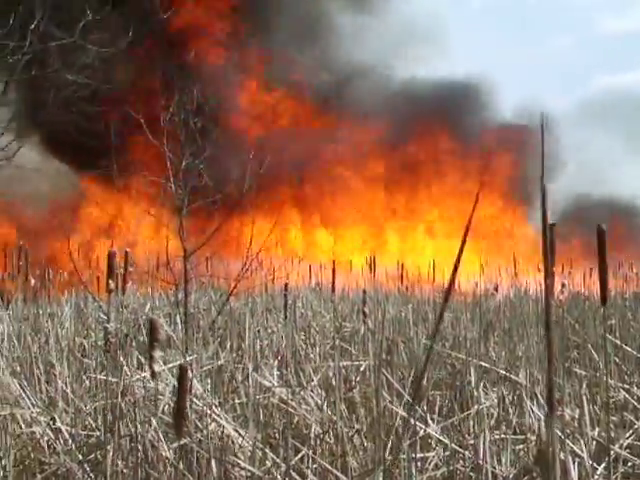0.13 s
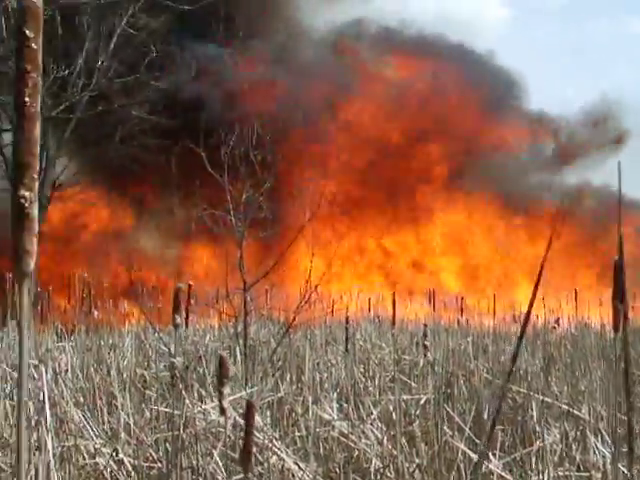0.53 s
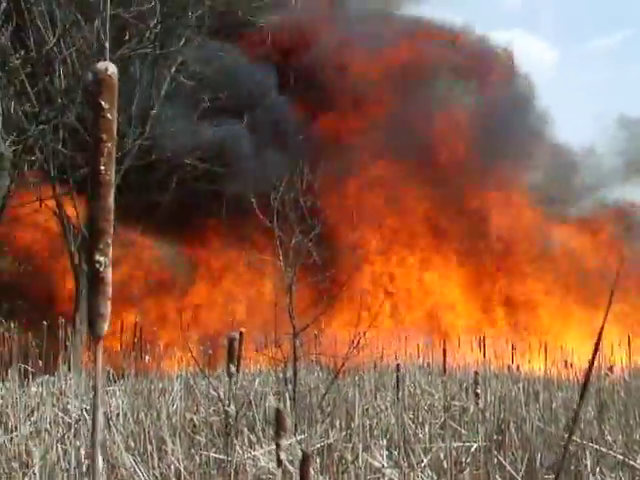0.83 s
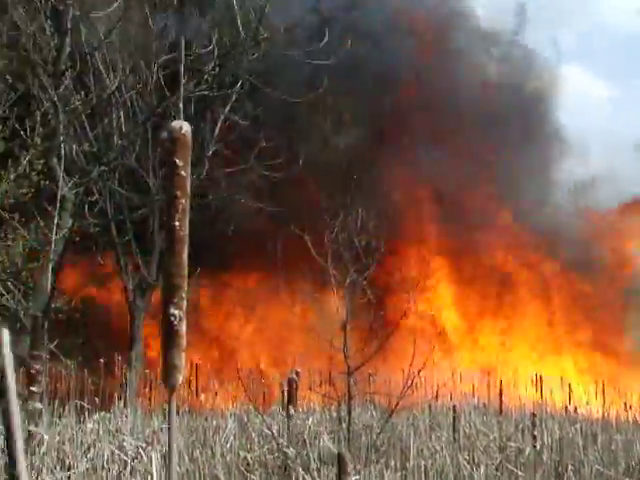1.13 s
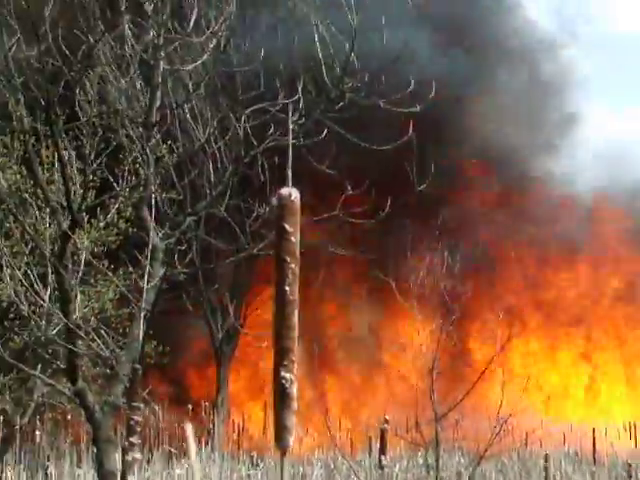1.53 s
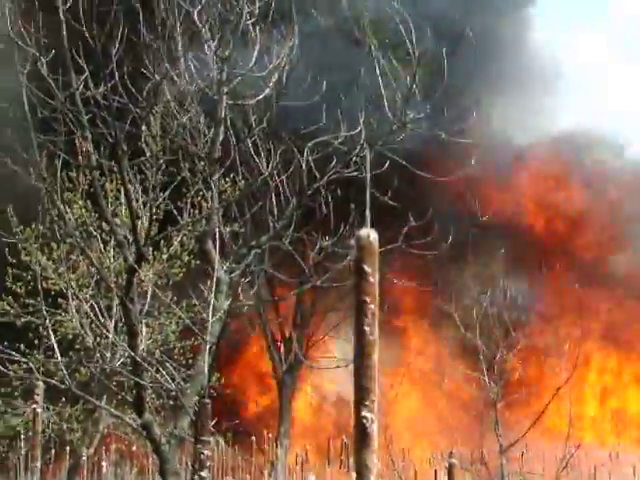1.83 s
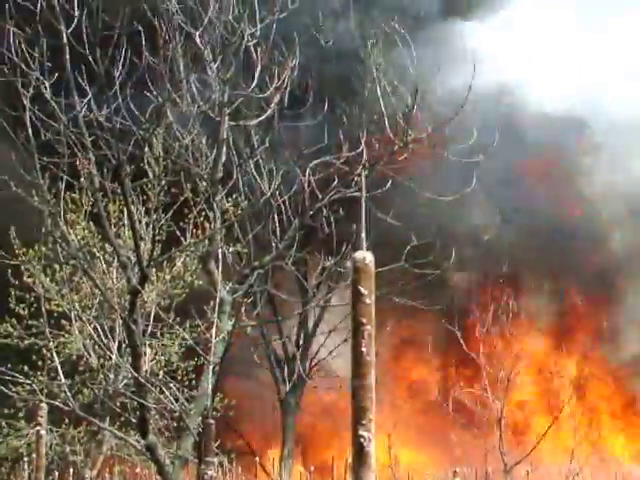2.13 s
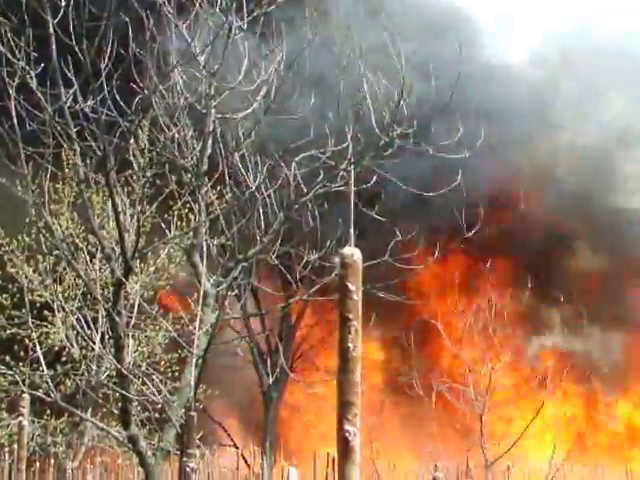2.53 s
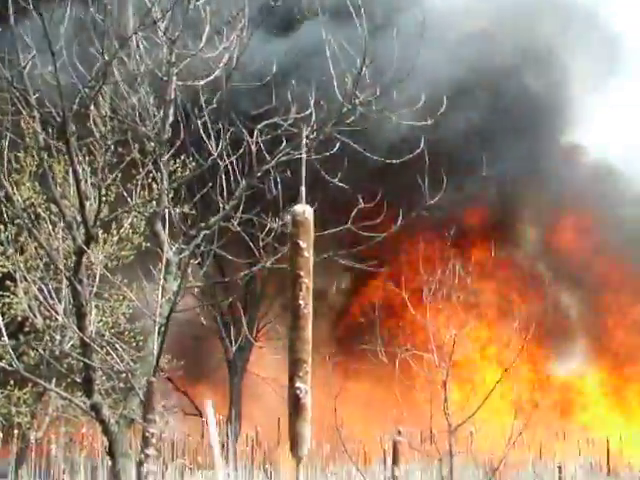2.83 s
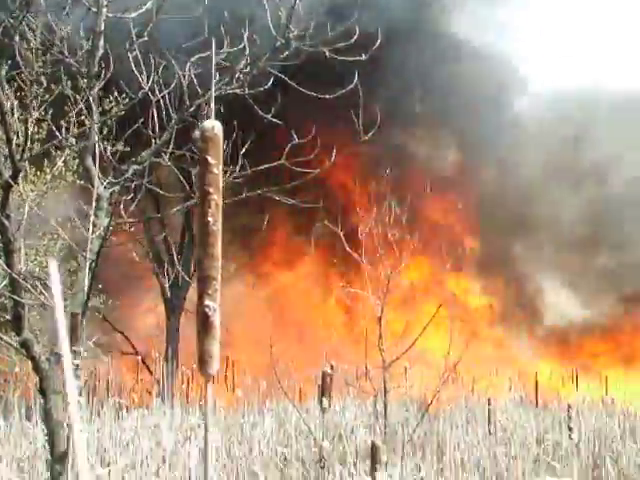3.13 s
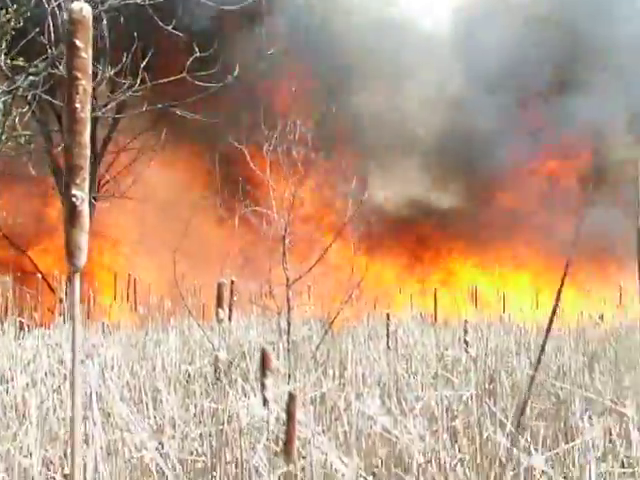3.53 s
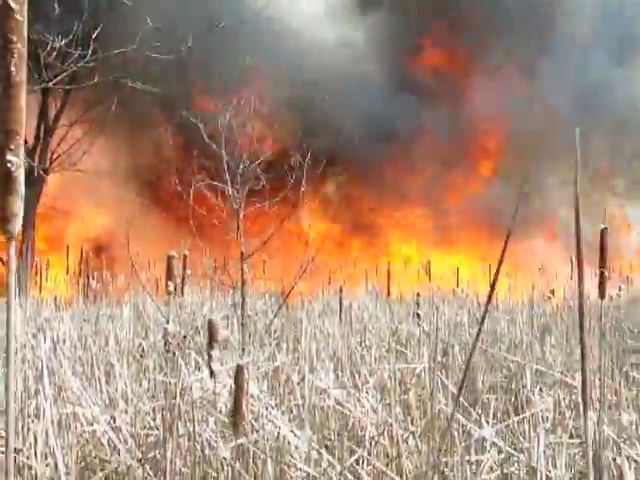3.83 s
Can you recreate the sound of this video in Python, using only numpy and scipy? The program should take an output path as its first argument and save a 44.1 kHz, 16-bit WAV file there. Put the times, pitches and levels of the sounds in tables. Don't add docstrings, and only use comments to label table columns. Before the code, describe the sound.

Fire in dry reeds: low turbulent roar and fine crackling throughout, a faint wavering draught whistle, one tiny bird chirp near one second, then sharper close pops in bursts. Open air, mono, limited treble, no echo.

```python
import sys
import numpy as np
from scipy import signal
from scipy.fft import rfft, irfft
from scipy.io import wavfile

SR = 44100
rng = np.random.default_rng(int(sys.argv[2]) if len(sys.argv) > 2 else 0)


def elevation(decibels):
    levels = np.asarray(decibels, float)
    return 10 ** (levels / 20)


def waveform_to_disk(signal):
    frames = np.transpose(np.atleast_2d(signal))
    scaled = np.clip(frames, -1, 1) * 32767
    samples = np.round(scaled).astype(np.int16)
    wavfile.write(sys.argv[1], SR, samples)


N = 176400

# t/s, wash level/dB
FAR_BURN = [
    (0.0, -33.5),
    (1.07, -34),
    (1.63, -32.5),
    (2.49, -33),
    (2.93, -33.5),
    (3.59, -32.5),
    (4.0, -35),
]
# f/Hz, density/dB per Hz
STEM_COLOUR = [(900, -28.5), (1500, -5), (2000, 0.5), (2600, -2), (4200, -2), (6000, -5), (8000, -8),
               (10000, -6)]
# t/s, sizzle level/dB
NEAR_BURN = [(0, -50), (.3, -47), (1.2, -50.5), (1.5, -40), (1.9, -38), (2.25, -37), (2.6, -38), (3.0, -42),
             (3.25, -41), (3.45, -35), (3.75, -36.5), (4, -43)]


def rms_one(x):
    return x / np.sqrt(np.mean(x ** 2) + 1e-20)


def in_time(rows):
    t_s, value = np.transpose(rows)
    return np.interp(np.arange(N) / SR, t_s, value)


def at_hz(points, hz):
    f_hz, db = np.transpose(points)
    return np.interp(np.log(hz), np.log(f_hz), db)


def drift(rate_hz):
    hop = 40
    r = np.exp(-2 * np.pi * rate_hz * hop / SR)
    noise = rng.standard_normal(N // hop + 2002)
    slow = signal.lfilter([1], [1, -2 * r, r * r], noise)[2000:]
    return np.interp(np.arange(N) / hop, np.arange(len(slow)), rms_one(slow - slow.mean()))


def resonance(x, hz, width_hz):
    r = np.exp(-np.pi * width_hz / SR)
    zeros = (1 - r * r) / 2 * np.array([1, 0, -1])
    poles = [1, -2 * r * np.cos(2 * np.pi * hz / SR), r * r]
    return signal.lfilter(zeros, poles, x)


def coloured(spectrum):
    hz = np.maximum(np.fft.rfftfreq(N, 1 / SR), 1)
    return rms_one(irfft(rfft(rng.standard_normal(N)) * elevation(at_hz(spectrum, hz)), N))


def decaying(hits, decay_s):
    return signal.lfilter([1], [1, -np.exp(-1 / (decay_s * SR))], hits + 1e-18)


def roar():
    # t/s, roar level/dB
    draught = [
        (0.0, -29),
        (0.61, -29.5),
        (2.75, -29.5),
        (2.94, -29.5),
        (4.0, -31.5),
    ]
    # f/Hz, density/dB per Hz
    body_colour = [(12, -39.5), (20, -3.5), (49, 1), (196, 1), (290, -1.5), (375, -9), (420, -16.5),
                   (550, -37.5), (920, -120)]
    # f/Hz, density/dB per Hz
    tongue_colour = [(250, -20.5), (400, -6), (520, -2.5), (800, 0.5), (1000, -1.5), (1300, -3),
                     (1700, -7.5), (2600, -20.5)]
    db = in_time(draught)
    mean_db = db.mean()
    rumble_db = mean_db + 0.33 * (db - mean_db) - 3
    rumble = elevation(rumble_db) * coloured(body_colour)
    rush_db = db - 1.5 + 0.24 * drift(2.2)
    return rumble + elevation(rush_db) * coloured(tongue_colour)


def wash():
    level_db = in_time(FAR_BURN) + 2.5 + 0.5 * drift(3.6) + 1.1 * drift(44.0)
    return elevation(level_db) * coloured(STEM_COLOUR)


def crackle():
    rate_per_s, level_db, spread_db, decay_s, relative_width = 350, -40.5, 1, 0.0011, 0.58
    burn_db = in_time(FAR_BURN)
    burn_db = burn_db - burn_db.mean()
    sizes = elevation(spread_db * np.minimum(rng.exponential(1, N), 4.0))
    clumps = elevation(1.5 * burn_db + 4.0 * drift(9.0))
    born = rng.random(N) < rate_per_s * clumps / SR
    band_of_stem = rng.integers(0, 12, N)
    noise = rng.standard_normal(N)
    out = np.zeros(N)
    for k, hz in enumerate(np.geomspace(1600, 8000, num=12)):
        spits = noise * decaying(sizes * born * (band_of_stem == k), decay_s)
        band = rms_one(resonance(spits, hz, relative_width * hz))
        out += elevation(at_hz(STEM_COLOUR, hz)) * np.sqrt(hz) * band
    return elevation(level_db + burn_db) * rms_one(out)


def sizzle():
    centre_hz, width_hz = 6920, 2550
    grains = rng.standard_normal(N) * elevation(1.0 * drift(150.0) + 1.7 * drift(28.0))
    once = resonance(grains, centre_hz, width_hz)
    return elevation(in_time(NEAR_BURN)) * rms_one(resonance(once, centre_hz, width_hz))


def ticks():
    rate_per_s, level_db, ring_hz, width_hz, decay_s = 120, -53, 7280, 460, 0.001
    near_db = in_time(NEAR_BURN)
    born = rng.random(N) < rate_per_s * elevation(near_db - near_db.mean()) / SR
    sizes = elevation(3.0 * np.minimum(rng.exponential(1, N), 2.0))
    spits = rng.standard_normal(N) * decaying(born * sizes, decay_s)
    return elevation(level_db) * rms_one(resonance(spits, ring_hz, width_hz))


def whistle():
    # t/s, pitch f/Hz, level/dB
    gusts = [(0, 1158, -40), (.35, 1140, -40), (.55, 1150, -46), (.9, 1120, -43), (1.3, 1125, -46),
             (1.39, 1130, -40), (1.47, 1135, -46), (1.75, 1152, -41), (2.1, 1140, -41), (2.3, 1140, -46),
             (2.5, 1132, -41), (3.0, 1135, -44), (3.5, 1130, -48), (4, 1125, -46)]
    waver_hz, breath_hz, clear = 6, 22, 1.3
    t_s, pitch_hz, db = np.transpose(gusts)
    pitch = in_time(np.c_[t_s, pitch_hz]) + waver_hz * drift(12.0)
    phase = 2 * np.pi * np.cumsum(pitch) / SR
    tone = (clear + drift(breath_hz)) * np.sin(phase)
    breath = drift(breath_hz) * np.cos(phase)
    return elevation(in_time(np.c_[t_s, db]) - 3) * (tone + breath)


def flares():
    # t/s, peak/dB, centre f/Hz, length/s
    tufts = [(.032, -16, 3800, .02), (1.5415, -17, 4000, .013), (1.566, -20, 4000, .012),
             (1.601, -16.5, 4200, .012), (1.952, -21, 1600, .03), (2.486, -17, 4800, .022),
             (3.5265, -17, 6000, .014), (3.57, -20, 5500, .016), (3.825, -20, 3800, .014),
             (3.89, -16.5, 6500, .009), (1.628, -19, 5000, .004), (2.811, -17, 3000, .006)]
    relative_width, rise_s = 1.1, .002
    out, t = np.zeros(N + SR), np.arange(SR // 10) / SR
    for start_s, db, hz, length_s in tufts:
        noise = rng.standard_normal(len(t))
        spray = rms_one(resonance(noise * np.abs(noise), hz, relative_width * hz))
        envelope = np.minimum(t / rise_s, 1) * np.exp(-(t / length_s) ** 2)
        i = int(start_s * SR)
        out[i:i + len(t)] += elevation(db) / 3 * spray * envelope
    return out[:N]


def pops(rows, trim_db=0):
    rise_s, rough, waver = .0003, .4, .045
    broad_db, tail_db, tail_s = -7, -10.5, 0.017
    out, t = np.zeros(N + SR), np.arange(SR // 10) / SR
    rise = np.minimum(t / rise_s, 1)
    for start_s, db, hz, length_s in rows:
        noise = rng.standard_normal(len(t))
        burst = np.exp(-(t / max(length_s, .0005)) ** 2)
        uneven = rms_one(resonance(noise, 600, 1200))
        phase = 2 * np.pi * hz * np.cumsum(1 + waver * uneven[::-1]) / SR
        ring = burst * rise * (1 + rough * uneven) * np.sin(phase)
        crack_envelope = rise * (elevation(broad_db) * burst + elevation(tail_db) * np.exp(-t / tail_s))
        crack = rms_one(resonance(noise, 5900, 7000)) * crack_envelope
        i = int(start_s * SR)
        out[i:i + len(t)] += elevation(db + trim_db) * (ring / np.abs(ring).max() + 0.65 * crack)
    return out[:N]


def splitting_stems():
    # t/s, peak/dB, ring f/Hz, burst length/s
    low_knocks = [
        (0.047, -13.5, 1540, 0.0012),
        (1.571, -25.5, 2220, 0.002),
        (1.9425, -24.5, 1660, 0.0037),
        (2.364, -30, 1950, 0.003),
        (2.814, -16, 2010, 0.0028),
        (2.933, -27, 1540, 0.0034),
        (3.835, -33, 2060, 0.003),
    ]
    thick_stems = [(0.0496, -13, 2680, 0.0027), (0.541, -16.5, 2400, 0.003), (0.984, -20.5, 4800, 0.003),
                   (1.116, -28, 4030, 0.003), (1.196, -19.5, 2470, 0.003), (1.307, -16.5, 2720, 0.003),
                   (1.721, -18, 2880, 0.0019), (1.9, -34.5, 4550, 0.003), (2.3121, -24.5, 4510, 0.0028),
                   (2.481, -16.5, 3930, 0.003), (2.6305, -17, 4410, 0.003), (2.813, -16, 3970, 0.0021),
                   (3.046, -22.5, 4050, 0.003), (3.195, -19.5, 3270, 0.0029), (3.4234, -15, 3380, 0.0027),
                   (3.818, -18.5, 4750, 0.003)]
    bright_stems = [(0.053, -30, 7650, 0.0027), (0.197, -31, 7210, 0.003), (1.303, -28, 5530, 0.003),
                    (1.9634, -26, 7640, 0.0039), (1.983, -23.5, 7490, 0.003), (2.026, -22, 7250, 0.0029),
                    (2.182, -15, 7380, 0.0035), (2.2394, -20, 7140, 0.0028), (2.3121, -16.5, 6930, 0.0026),
                    (2.4473, -16.5, 7170, 0.003), (2.4862, -17, 6400, 0.0017), (2.494, -18, 6220, 0.003),
                    (2.504, -18.5, 7870, 0.003), (2.588, -12, 6270, 0.004), (2.602, -14, 6820, 0.0038),
                    (2.7561, -13, 6200, 0.0021), (2.9223, -12, 7800, 0.0035), (3.1048, -19.5, 5770, 0.0026),
                    (3.345, -17, 7530, 0.0033), (3.3503, -14.5, 5760, 0.0038),
                    (3.4124, -14.5, 7040, 0.0039), (3.4231, -13, 6000, 0.0039), (3.727, -17, 6200, 0.0047),
                    (3.7344, -13.5, 7870, 0.0028), (3.7505, -14, 6080, 0.003), (3.7813, -19, 6100, 0.0043),
                    (3.9874, -14.5, 6470, 0.0051)]
    nearest_runs = [(1.544, -17, 6600, .004), (1.545, -23, 2500, .003), (1.5515, -24, 3400, .003),
                    (1.5657, -15, 3650, .0035), (1.5672, -29, 7200, .002), (1.605, -20, 4900, .003),
                    (1.975, -20, 2100, .003), (1.977, -23, 1200, .003), (3.527, -20, 7400, .002),
                    (3.5298, -12, 5700, .002), (3.5617, -22, 6800, .002), (3.5705, -19, 2100, .004),
                    (3.5775, -20.5, 3900, .003), (3.583, -25, 6500, .002), (3.604, -22, 6500, .002),
                    (3.609, -25, 5600, .003), (3.8586, -17, 7850, .002), (3.8586, -20, 3150, .0025),
                    (3.859, -21, 6300, .002), (3.8882, -16, 5900, .0025), (3.8886, -17, 4800, .002),
                    (3.8886, -21, 6900, .002), (3.8884, -26, 2800, .002), (3.892, -28, 7400, .003)]
    # t/s, peak/dB
    grass_snaps = [(.205, -34.5), (.651, -37.5), (.787, -35.5), (1.111, -35.5), (1.306, -34), (1.495, -33),
                   (1.628, -28), (1.892, -24.5), (1.899, -29), (1.907, -30.5), (1.949, -26.5), (2.039, -25),
                   (2.197, -30), (2.228, -23), (2.328, -22), (2.481, -19.5), (3.105, -33.5), (3.110, -23.5),
                   (3.114, -28), (3.351, -20), (3.424, -18.5), (3.652, -24.5), (3.782, -21.5)]
    # t/s, peak/dB, ring f/Hz
    soft_taps = [
        (1.080, -34, 2510),
        (1.405, -32.5, 4030),
        (1.827, -26.5, 2500),
        (2.340, -25.5, 4200),
        (2.362, -30, 2500),
        (2.412, -26.5, 6120),
        (2.494, -28, 2630),
        (2.769, -29, 4200),
    ]
    small = [(t_s, db, 7800, .002) for t_s, db in grass_snaps]
    small += [(t_s, db, hz, .0023) for t_s, db, hz in soft_taps]
    single = [*bright_stems, *thick_stems, *low_knocks]
    return pops(nearest_runs) + pops(small) + pops(single, trim_db=-7)


def bird():
    start_s, length_s, from_hz, to_hz, level_db = 1.043, .05, 4850, 4320, -34
    twin_hz, twin_rise_hz = 4800, 230
    u = (np.arange(N) / SR - start_s) / length_s
    fall_hz = to_hz + (from_hz - to_hz) * (1 - np.clip(u / .65, 0, 1)) ** 1.3
    rise_hz = twin_hz + twin_rise_hz * np.tanh(3 * (u - .7))
    pieces = np.exp(-((u - .3) / .2) ** 2) + .6 * np.exp(-((u - .8) / .14) ** 2)
    chirp = pieces * np.sin(2 * np.pi * np.cumsum(fall_hz) / SR)
    twin = .4 * np.exp(-((u - .95) / .3) ** 2) * np.sin(2 * np.pi * np.cumsum(rise_hz) / SR)
    return elevation(level_db) * (chirp + twin)


def scene():
    far = roar() + wash() + crackle()
    near = sizzle() + ticks() + flares() + splitting_stems()
    return (far + near + whistle() + bird())[None]


def roll_off(x):
    return signal.sosfilt(signal.butter(12, 9290, fs=SR, output="sos"), x)


def record(dry):
    # f/Hz, gain/dB
    top_cut = [(7600, 0), (8000, -3), (8300, -9), (8500, -15.5), (8800, -26.5), (9000, -37.5), (9150, -50),
               (9300, -71)]
    half_rate_hz, offset = 8000, -.0024
    hz = np.maximum(np.fft.rfftfreq(N, 1 / SR), 1)
    bins = rfft(dry)
    half = half_rate_hz * N // SR
    bins[:, half:2 * half] = np.conj(bins[:, half:0:-1])
    mix = irfft(bins * elevation(at_hz(top_cut, hz)), N) + offset
    return roll_off(mix)


dry = scene()
out = record(dry)
waveform_to_disk(out)
```